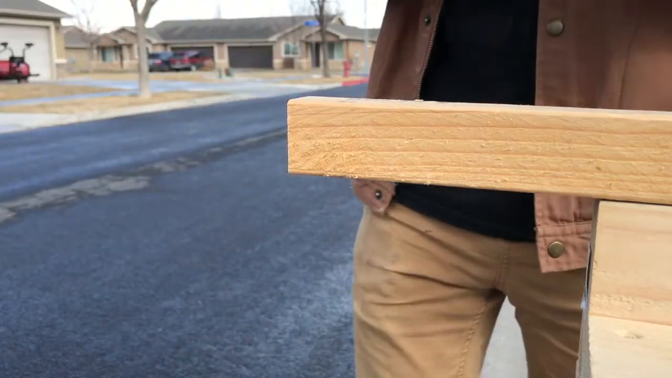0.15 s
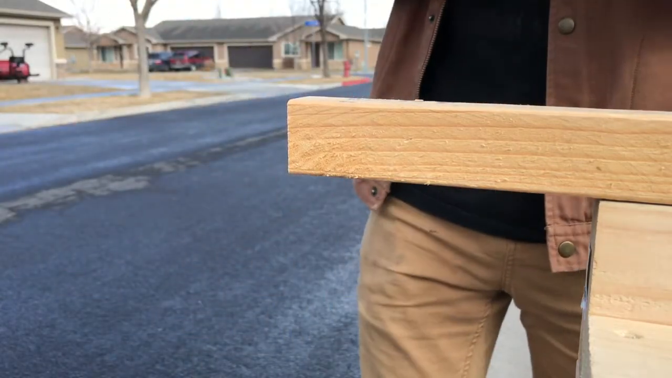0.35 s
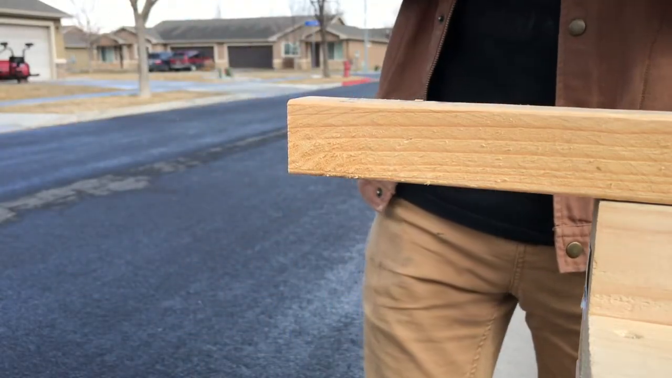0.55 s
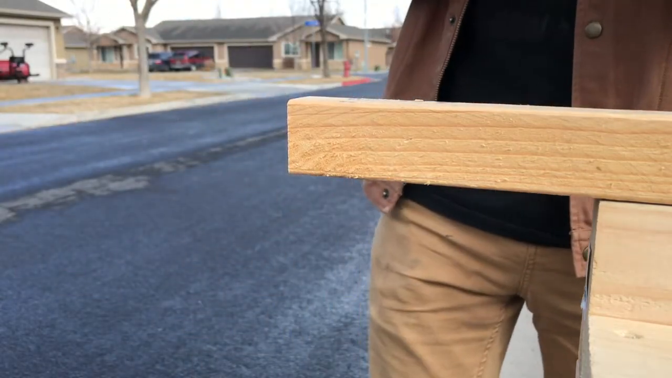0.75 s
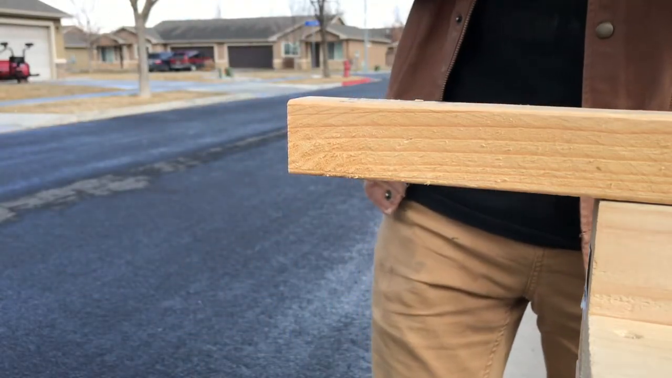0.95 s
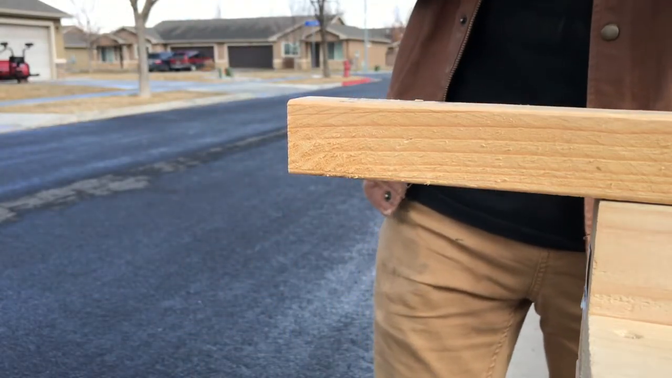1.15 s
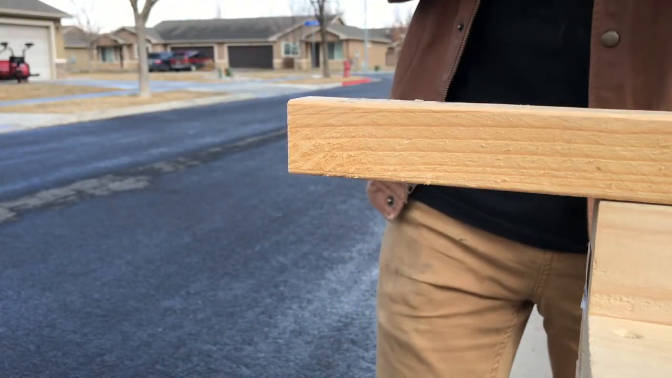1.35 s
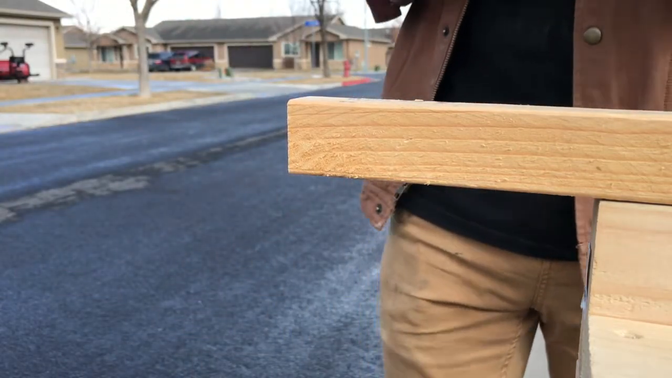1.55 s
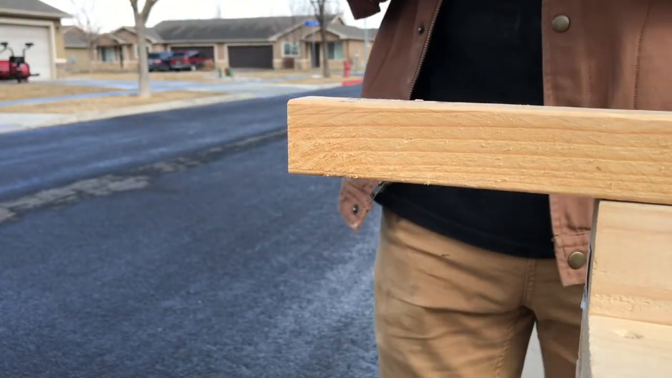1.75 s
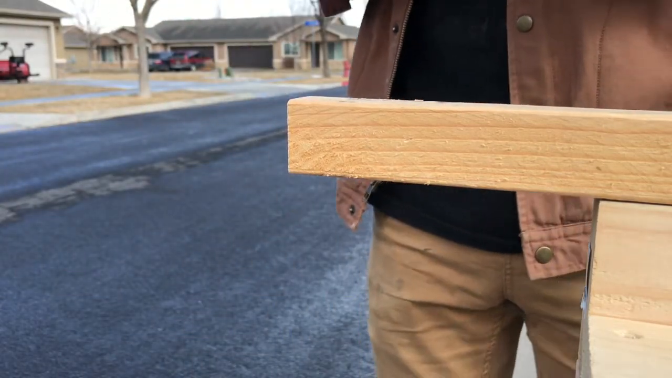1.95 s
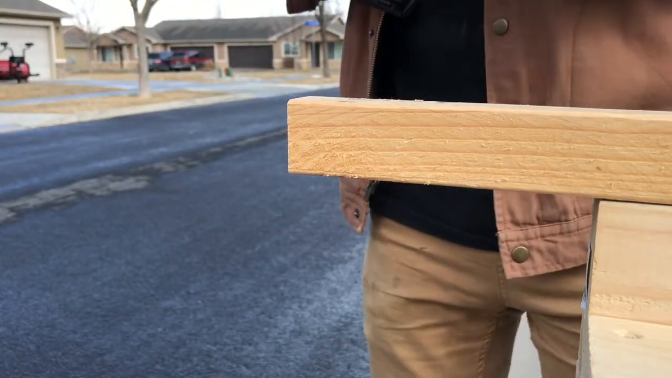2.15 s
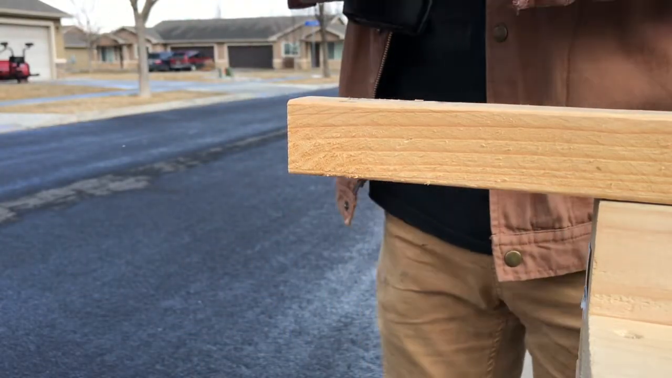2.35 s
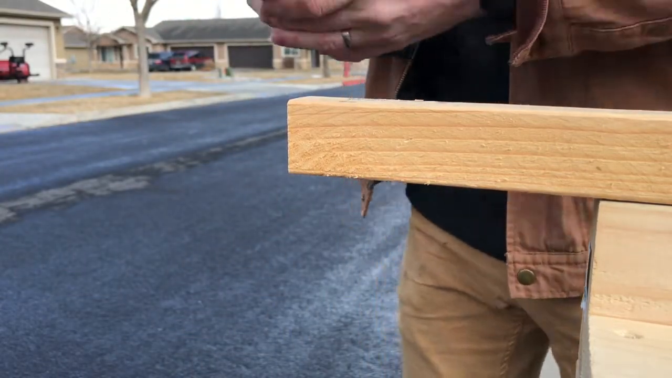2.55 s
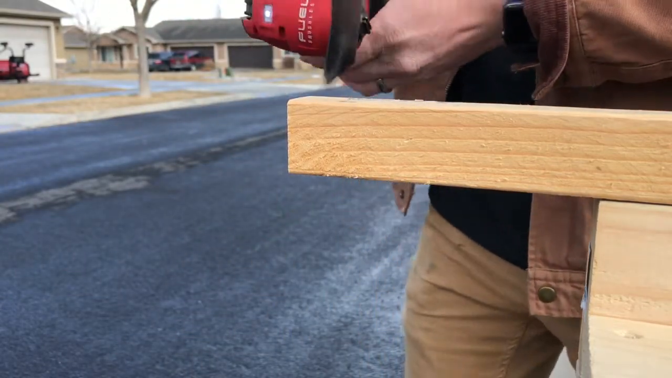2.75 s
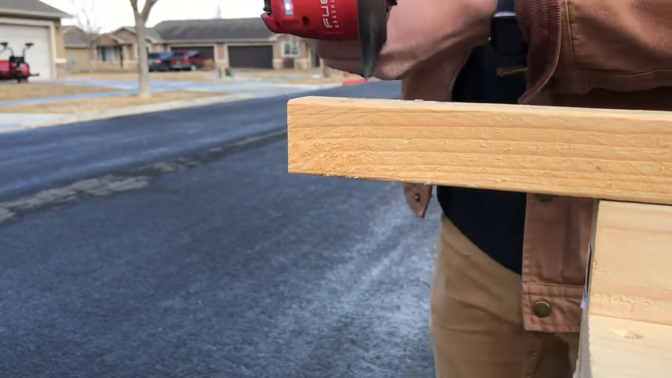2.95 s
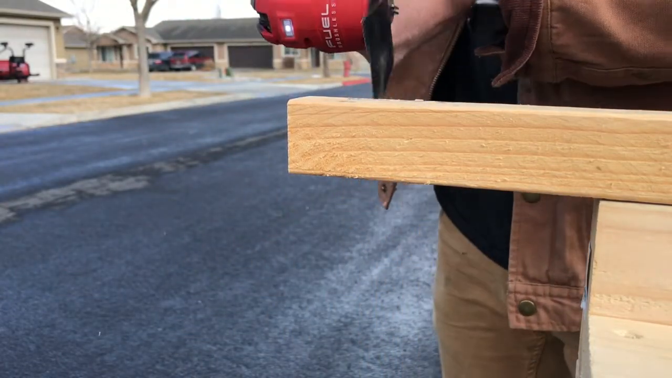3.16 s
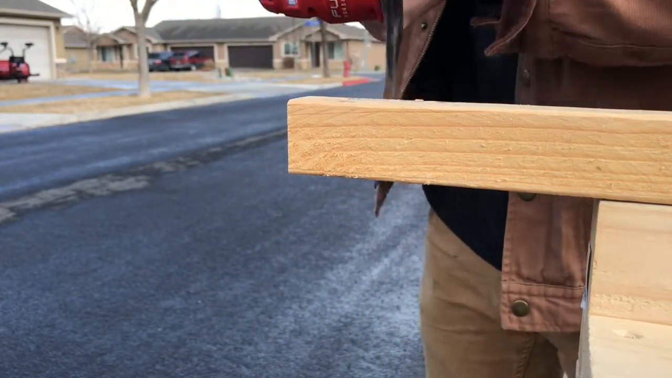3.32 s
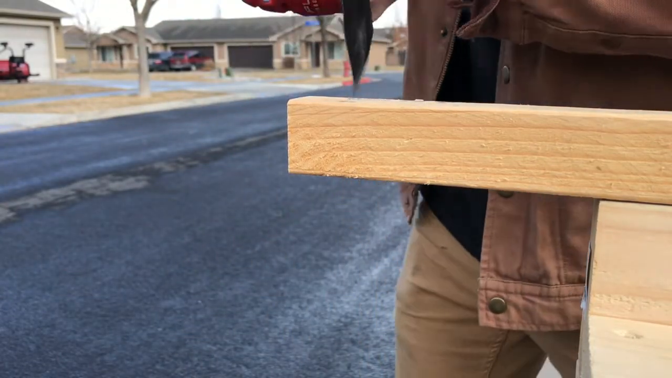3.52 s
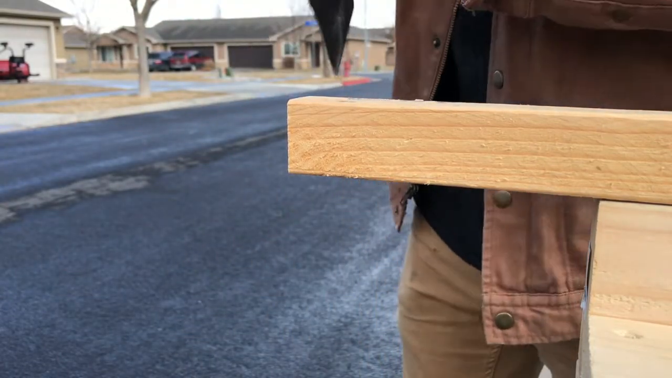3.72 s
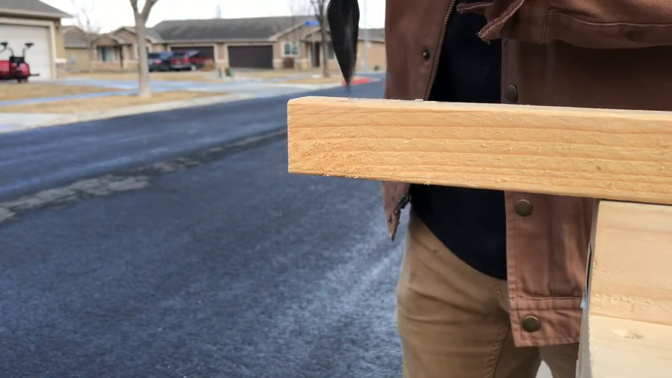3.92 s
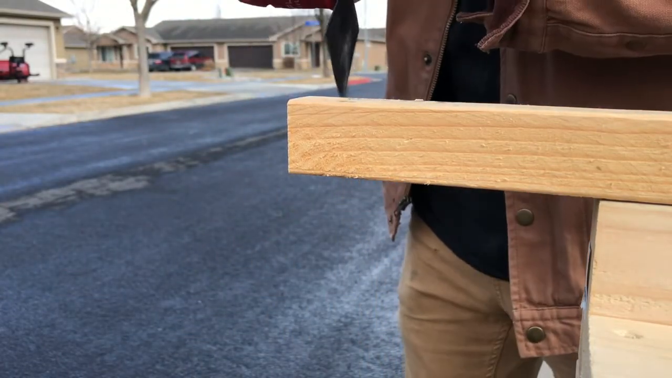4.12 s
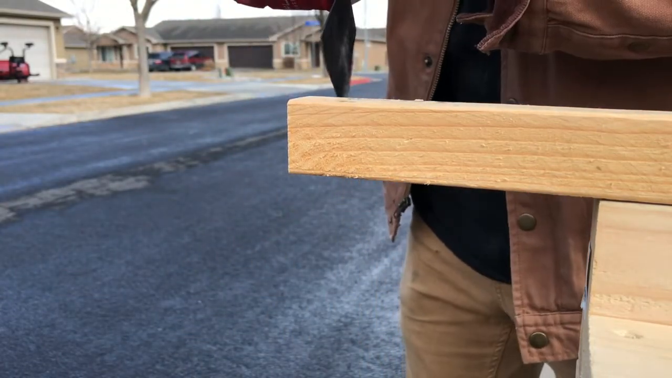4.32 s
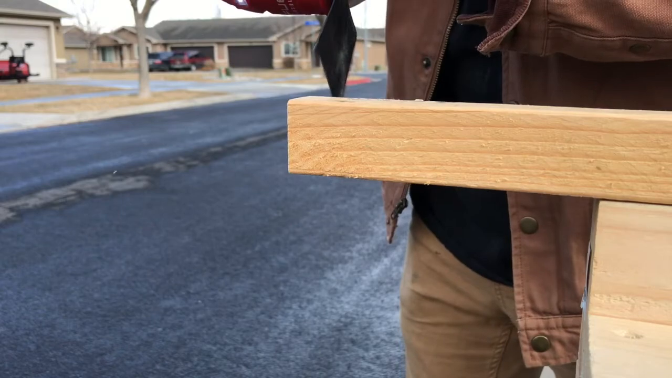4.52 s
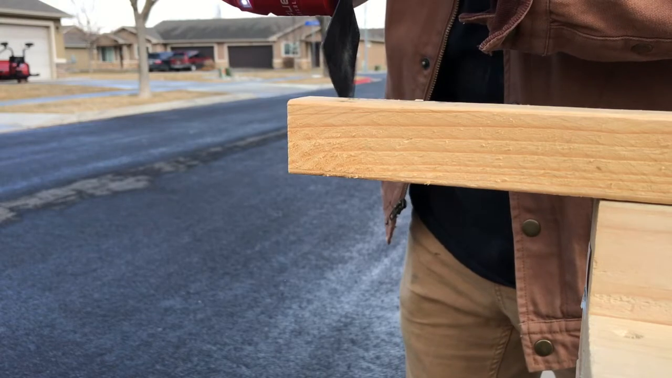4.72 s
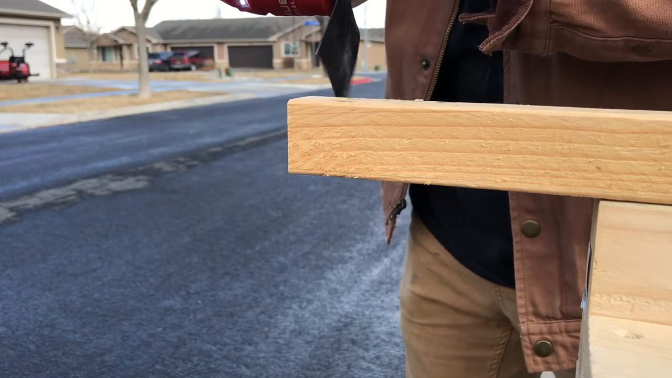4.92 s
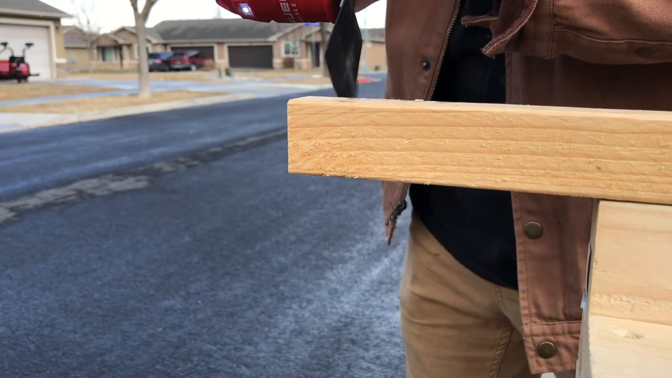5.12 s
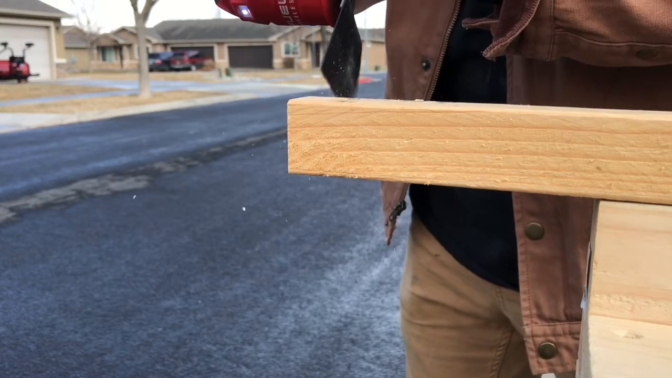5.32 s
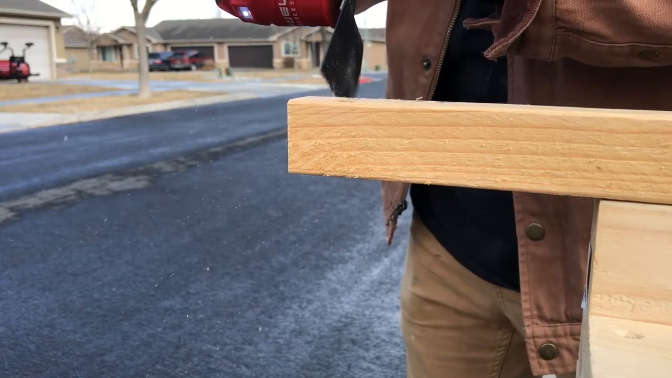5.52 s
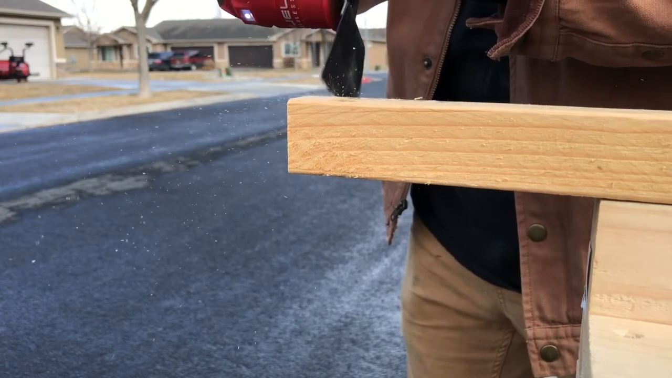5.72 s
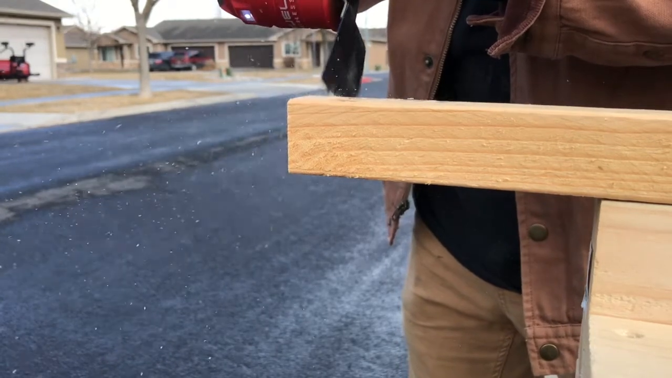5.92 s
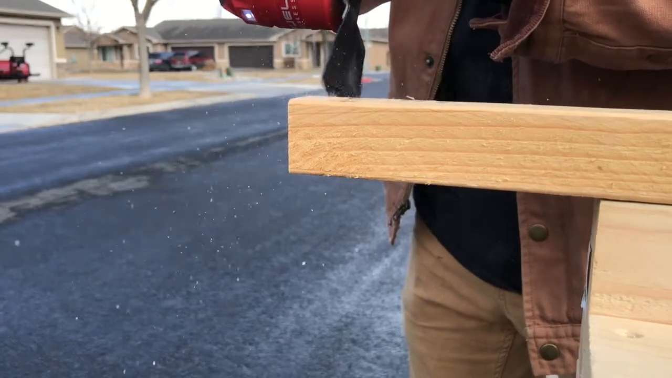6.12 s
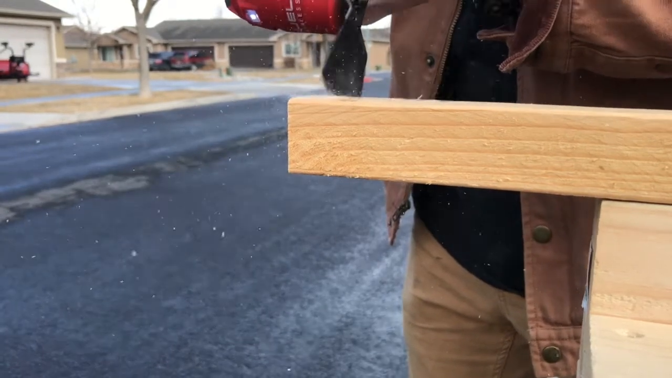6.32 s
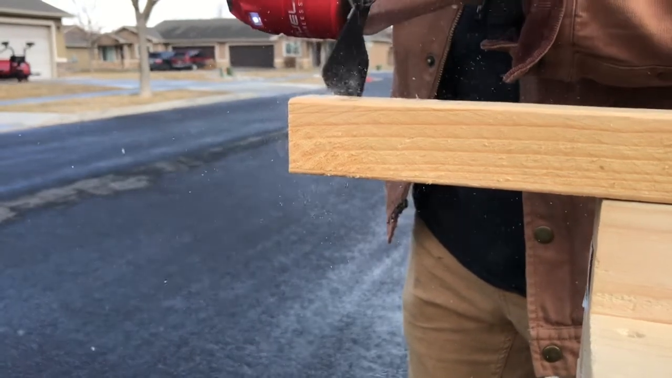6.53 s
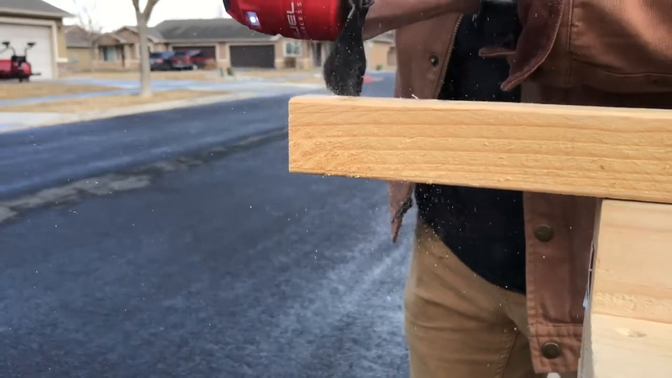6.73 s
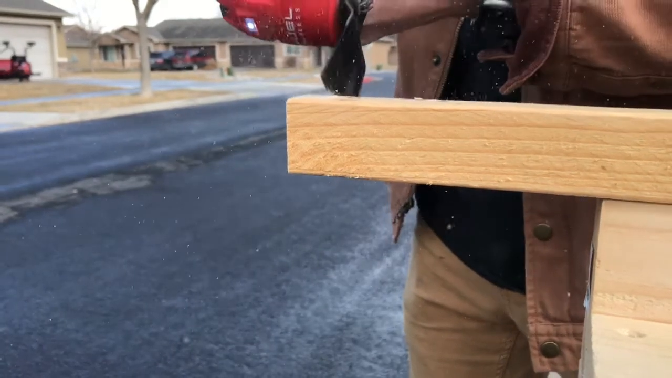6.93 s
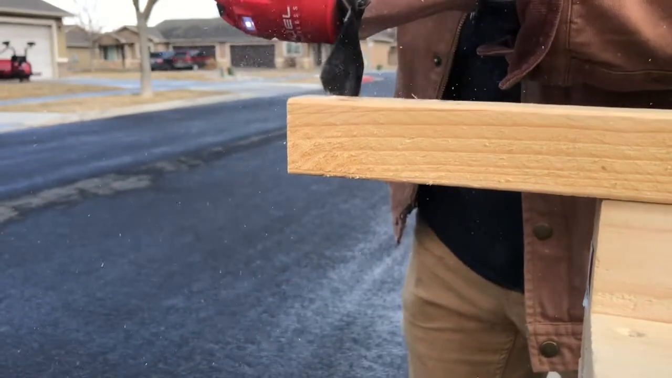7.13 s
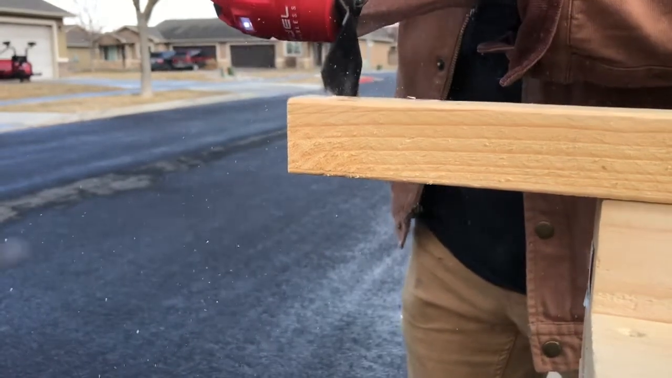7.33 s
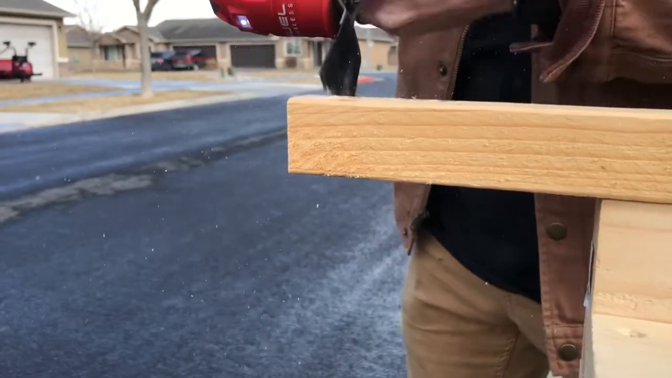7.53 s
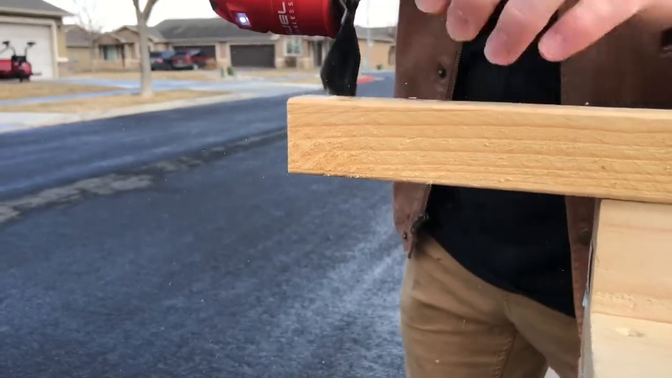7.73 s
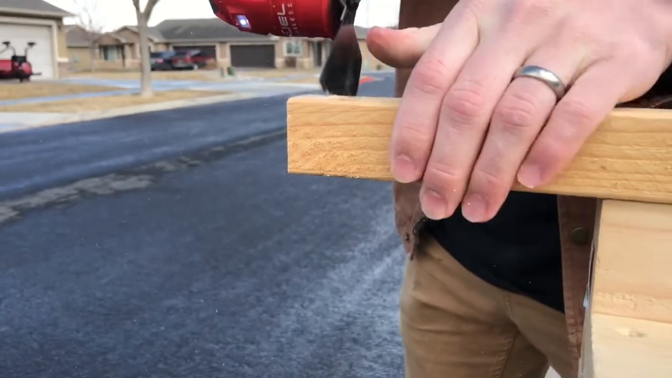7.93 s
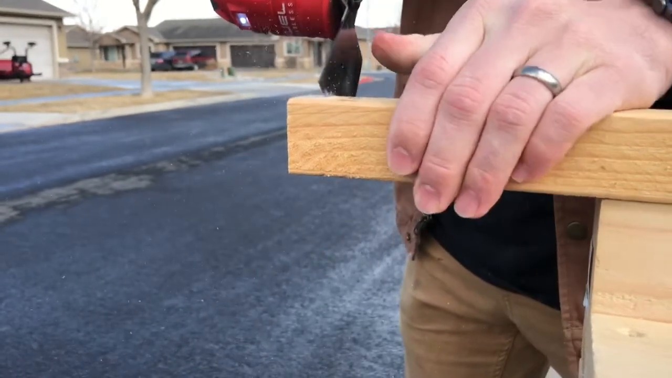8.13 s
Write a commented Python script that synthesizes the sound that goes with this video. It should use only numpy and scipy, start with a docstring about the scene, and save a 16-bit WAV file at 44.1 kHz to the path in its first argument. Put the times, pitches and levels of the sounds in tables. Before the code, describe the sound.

Wind rumbles softly before an oscillating power tool whines up suddenly, becomes quieter, then bites wood with a sagging, knocking, hissing buzz.

```python
"""A cordless oscillating multi-tool cuts a softwood plank: each stroke knocks the wood and sawdust hisses.
The knocks are stroke harmonics, the dust is pulsing noise, and the pitch sags as the hand pushes.
Before the cut the tool is switched on and lowered: its drive buzzes and rattles, the steel blade rings,
and soon after the start the level drops abruptly. Behind it, shaped noise makes a quiet, breezy street,
puffs of wind, and the rustle of hands and jacket."""
import sys
import numpy as np
from scipy import signal
from scipy.fft import rfft, irfft, next_fast_len
from scipy.io import wavfile
from scipy.ndimage import uniform_filter1d, map_coordinates

SR = 44100
rng = np.random.default_rng(int(sys.argv[2]) if len(sys.argv) > 2 else 0)


def inscribe(sig):
    """Save sig as 16-bit PCM at rate SR to the path in sys.argv[1].

    A 1-D sig is mono; a 2-D sig holds one channel per row.
    Samples are clipped to [-1, 1] before scaling.
    """
    pcm = np.round(np.clip(np.atleast_2d(sig).T, -1, 1) * 32767)
    wavfile.write(sys.argv[1], SR, pcm.astype(np.int16))


N = 364707
# samples a control frame, points a stroke, harmonics computed
HOP, POINTS, HARMONICS = 220, 1024, 50
TIME = np.arange(N) / SR
FRAMES = np.arange(N // HOP + 2) * HOP / SR
ORDER = np.arange(1, HARMONICS + 1)


def undb(db):
    """Decibels to gain."""
    return 10 ** (np.asarray(db) / 20)


def curve(table, t):
    """The columns of a table after its times, joined by straight lines, at times t."""
    s, *columns = np.transpose(table)
    return [np.interp(t, s, c) for c in columns]


def ramp(t, start, length):
    """Rises evenly from 0 to 1 over the given time."""
    return np.clip((t - start) / length, 0, 1)


def bursts(table):
    """Gain made of bell-shaped swells (t/s, half length/s, level/dB)."""
    return sum(undb(db) * np.exp(-((TIME - s) / length) ** 2) for s, length, db in table)


def unit(x):
    """Scale to rms 1."""
    return x / np.sqrt(np.mean(x ** 2))


def noise(gain_at):
    """Unit noise whose spectrum follows a function of frequency."""
    size = next_fast_len(N)
    hz = np.arange(size // 2 + 1) * SR / size + 1
    spectrum = rfft(rng.standard_normal(size)) * gain_at(hz)
    return unit(irfft(spectrum, size)[:N])


def colour(points, hz):
    """Gain of a (f/Hz, level/dB) spectrum at the given frequencies."""
    f, db = np.transpose(points)
    return undb(np.interp(np.log(hz), np.log(f), db))


def coloured_noise(points):
    """Unit noise with a (f/Hz, level/dB) spectrum."""
    return noise(lambda hz: colour(points, hz))


def wander(rate):
    """Smooth random drift, one column a harmonic, rms 1 overall; faster movement than rate (Hz) fades."""
    steps = rfft(rng.standard_normal((len(FRAMES), HARMONICS)), axis=0)
    hz = np.arange(len(steps))[:, None] / FRAMES[-1]
    return unit(irfft(steps / (1 + (hz / rate) ** 2), len(FRAMES), axis=0))


def catching(rate):
    """Random levels for each harmonic that hold, then jump about rate times a second."""
    spell = np.cumsum(rng.random(len(FRAMES)) < rate * HOP / SR)
    levels = rng.standard_normal((len(FRAMES), HARMONICS))[spell]
    return uniform_filter1d(levels, size=4, axis=0)


def harmonics(table, top_db, fall_db):
    """Levels of all harmonics; above the table they start at top_db and fall by fall_db an octave."""
    k, db = np.transpose(table)
    listed = np.interp(ORDER, k, db - db.max())
    return np.where(ORDER <= k[-1], listed, top_db - fall_db * np.log2(ORDER / k[-1]))


def strokes(turns, partials):
    """Play complex harmonic amplitudes (frames x harmonics) on the shaft's turning."""
    cycles = irfft(np.pad(partials, ((0, 0), (1, 0))), POINTS) * POINTS / np.sqrt(2)
    cycles = np.hstack([cycles, cycles[:, :1]])  # close the loop
    return map_coordinates(cycles, [np.arange(N) / HOP, turns % 1 * POINTS], order=1)


def pulsing(turns, depth):
    """A gain of rms 1 that peaks once a turn."""
    return unit(np.exp(depth * np.cos(2 * np.pi * turns)))


# colour of the far traffic: f/Hz, level/dB (relative)
STREET_COLOUR = [(30, -45), (200, -2), (500, -6.5), (1000, 1.5), (1500, -7.5), (2500, -18.5), (4500, -26.5),
                 (10000, -31.5), (15000, -23.5)]


def street():
    """Far traffic: coloured noise that swells and fades slowly at random."""
    swell_db = np.interp(TIME, FRAMES, wander(1)[:, 0])
    return coloured_noise(STREET_COLOUR) * undb(swell_db - 61.5)


# colour of the wind's rumble: f/Hz, level/dB (relative)
WIND_COLOUR = [(20, -22), (48, 0), (90, -5), (200, -20), (400, -36), (4000, -110)]
# the breeze, which rises and then mostly dies away: t/s, level/dB (before the flutter)
BREEZE = [(0, -48), (1.35, -40.5), (1.55, -55.5), (2.0, -56.5), (2.3, -62), (3.2, -64), (3.6, -76.5),
          (5.2, -72), (5.9, -88), (6.45, -73), (7.7, -93)]
# puffs of wind on the microphone: t/s, half length/s, level/dB (before their flutter and a 2.5 dB cut)
GUSTS = [(.72, 0.019, -32), (1.2, 0.033, -29.5), (1.34, 0.061, -36.5), (1.425, 0.012, -21.5),
         (1.63, 0.032, -36.5), (2.8, 0.035, -52), (3.1, 0.091, -53.5), (4.03, .04, -53),
         (4.45, 0.093, -44.5), (4.76, 0.064, -44), (5.05, 0.029, -45), (5.28, .12, -44)]
FLUTTER_HZ, FLUTTER_DB = 8.6, 3.5  # rate, and rms depth in the breeze


def wind():
    """Turbulent air rumbles low and flutters: a breeze with puffs on top."""
    rumble = coloured_noise(WIND_COLOUR)
    rumble = rumble / np.sqrt(uniform_filter1d(rumble ** 2, size=2205))  # even level over 50 ms
    flutter = np.interp(TIME, FRAMES, wander(FLUTTER_HZ)[:, 0])
    breeze = undb(curve(BREEZE, TIME)[0] + FLUTTER_DB * flutter)
    puffs = bursts(GUSTS) * undb(1.5 * flutter - 2.5)
    return rumble * (breeze + puffs)


# colour of rubbing cloth: f/Hz, level/dB (relative)
CLOTH_COLOUR = [(200, -20), (1000, -5), (4000, 6), (7000, 0.5), (10500, -2), (14000, -11)]
# sleeve and grip rustles, then the trigger: t/s, half length/s, level/dB
RUSTLES = [(.26, .069, -70.5), (.77, .015, -75), (1.0, .04, -79), (1.42, .04, -72), (1.48, 0.014, -65),
           (1.812, .008, -49.5)]


def rustles():
    """Hands and jacket rub in short swells of noise; the last is the trigger."""
    return coloured_noise(CLOTH_COLOUR) * bursts(RUSTLES)


# colour of the loose drive, for its click and its rattle: f/Hz, level/dB (relative)
RATTLE_COLOUR = [(100, -29), (480, -25), (850, -13), (1400, -5), (2600, -4), (4000, -0.5), (5200, 3),
                 (6800, -4.5), (8400, -3), (10000, -37), (11500, -0.5), (13400, -3.5), (14300, -4),
                 (15500, -3.5)]
CLICK_S, CLICK_DB = 1.855, -50


def click():
    """The drive takes up its play: noise that starts at once and dies within milliseconds."""
    decay = np.exp(-np.abs(TIME - CLICK_S) / 0.0051) * (TIME > CLICK_S)
    return coloured_noise(RATTLE_COLOUR) * undb(CLICK_DB) * decay


# pace while the hand pushes the blade into the wood: t/s, strokes per second f/Hz (before it wavers)
PUSHED_SPEED = [(5.39, 330), (5.77, 319.3), (5.95, 320.3), (6.26, 306), (6.51, 314.3), (6.6, 306),
                (6.62, 309.8), (6.73, 306.4), (6.77, 299.2), (6.85, 298.2), (7.03, 310.5), (7.13, 309.1),
                (7.35, 319.9), (7.44, 319.2), (7.6, 314.3), (7.91, 317.4), (8.1, 301.4), (8.27, 298.6)]
FREE_HZ = 332  # strokes per second when running free
START_S, RAMP_HZ_PER_S = 1.862, 1630
CREEP_HZ, CREEP_S = 8.5, .17  # the last few Hz arrive slowly
EASE_HZ = 14  # how softly the ramp rounds off
# the teeth skate, then bite over this time
BITE_S, BITE_TAKES_S = 5.233, 0.45


def since_full_ramp():
    """Seconds since the steady ramp would reach the free speed, 0 until then."""
    return np.maximum(TIME - START_S - FREE_HZ / RAMP_HZ_PER_S, 0)


def motor():
    """Strokes per second: a ramp, a creep to free speed and a sag in the wood, wavering slightly."""
    rising = RAMP_HZ_PER_S * (TIME - START_S)
    held, = curve([(BITE_S, FREE_HZ)] + list(PUSHED_SPEED), TIME)
    waver = 0.16 * np.sin(2 * np.pi * 17.0 * TIME)
    waver = waver + 0.2836 * np.interp(TIME, FRAMES, wander(25.5)[:, 0])
    held = held - CREEP_HZ * np.exp(-since_full_ramp() / CREEP_S) + waver
    # a soft minimum of the ramp and the held speed
    return np.maximum(-EASE_HZ * np.logaddexp(-rising / EASE_HZ, -held / EASE_HZ), 0)


# hum of the housing as the tool is turned and pressed: t/s, level/dB (at free speed, before the drop)
HUM = [(2.08, -38.5), (2.6, -47), (3.7, -36), (5.1, -35.5), (5.25, -41), (5.5, -28.5), (5.9, -36),
       (6.75, -29.5), (7.3, -34.5), (8.27, -32.5)]


def body(turns, speed):
    """The housing swings against the blade and hums at the stroke rate, louder with speed."""
    hum = np.sqrt(2) * np.cos(2 * np.pi * turns)
    return hum * (speed / FREE_HZ) ** 2 * undb(curve(HUM, TIME)[0])


# stroke harmonics when just started: multiple, level/dB (relative)
STARTING = [(1, -6.5), (2, -5), (3, -2.5), (4, -2.5), (5, -7.5), (6, -3.5), (7, -3.5), (8, -2), (9, -8),
            (10, -5), (11, -9), (12, -10), (13, 1), (14, -4), (15, 2), (16, -4.5), (17, 1), (18, -5.5),
            (19, -5), (20, -5), (21, -7), (22, -17), (23, -9), (24, -1.5)]
# stroke harmonics when running free: multiple, level/dB (relative)
FREE = [(1, -6), (2, -11), (3, 2.5), (4, -5.5), (5, -12), (6, -15.5), (7, -10), (8, -7.5), (9, -5.5),
        (10, -1), (11, -12), (12, -6.5), (13, -12.5), (14, -9), (15, -5), (16, -8.5), (17, -11.5),
        (18, -12.5), (19, -23), (20, -9.5), (21, -28), (22, -14), (23, -13), (24, -16), (25, -4.5),
        (26, -5.5), (27, -10.5), (28, -18)]
# echo from the plank lifts a band that rises, then slides down, ending as a dip: t/s, f/Hz, lift/dB
ECHO = [(2.05, 4960, 4.5), (2.3, 5900, 3.5), (2.5, 5900, 0), (2.8, 4687, 7.5), (3.3, 4070, 6),
        (4.2, 3305, -2.5)]
# the tool turns its blade down to the plank
TURN_S, TURN_TAKES_S = 2.4, 1.25
FACING_DB = 7.5  # halfway through the turn the flat of the blade faces the microphone and lifts the octave


def buzz(turns, speed):
    """The eccentric swings the blade: harmonics of the stroke above the hum, at rms near 1."""
    hz = np.maximum(np.interp(FRAMES, TIME, speed), 1)[:, None] * ORDER
    lowered = ramp(FRAMES, TURN_S, TURN_TAKES_S)[:, None]
    # resonances stay in place while the harmonics sweep up through them
    first = np.interp(hz / FREE_HZ, ORDER, harmonics(STARTING, -7.0, 5.8))
    later = np.interp(hz / FREE_HZ, ORDER, harmonics(FREE, -20.0, 3.8))
    echo_hz, echo_db = (c[:, None] for c in curve(ECHO, FRAMES))
    db = (1 - lowered) * first + lowered * later
    db = db + echo_db * np.exp(-(np.log(hz / echo_hz) / 0.093) ** 2)
    db = db + FACING_DB * np.sin(np.pi * lowered) * (ORDER == 2)
    db = db + 2.66 * wander(0.78) * np.minimum(ORDER / 6, 1)
    gains = undb(db) * (ORDER > 1)  # the hum is played by the housing
    gains = gains / np.linalg.norm(gains, axis=1, keepdims=True)
    # high harmonics are the least steady
    shake = np.minimum(ORDER * 0.023, .55) * (wander(34) + 1j * wander(5.8))
    # low harmonics push together once the blade is lowered
    lag = np.minimum(ORDER * 0.27 + 2 * (1 - lowered), 2.4) * rng.standard_normal(HARMONICS)
    treble_cut = 1 + (hz / 13500) ** 20
    return strokes(turns, gains * (1 + shake) * np.exp(1j * lag) / treble_cut)


def rattle(turns):
    """Play in the bearings rattles: noise that pulses once and twice a stroke."""
    return coloured_noise(RATTLE_COLOUR) * pulsing(turns, 0.24) * pulsing(2 * turns, 0.2)


# resonances of blade and housing: f/Hz, width/Hz, level/dB (relative, before dividing by root width)
STEEL = [(5460, 290, -10), (7100, 70, -28.5), (8400, 20, 1.5), (8700, 32, 1), (9100, 29, -3),
         (11000, 180, -3.5), (12941, 25, -25)]


def resonances(hz):
    """Summed gain of the steel's resonant peaks at each frequency."""
    return sum(undb(db) / np.sqrt(w) / (1 + (2 * (hz - f) / w) ** 2) ** 0.6 for f, w, db in STEEL)


def ring():
    """Blade and housing ring: noise through narrow resonances."""
    return noise(resonances)


# brief squeals of the blade: t/s, half length/s, level/dB (rms of each tone, before the drop)
SQUEALS = [(2.188, 0.039, -26), (2.255, 0.012, -35), (2.3, 0.014, -33.5)]


def squeal(turns):
    """The blade squeals in two equal tones, at 10 and 20 times the stroke rate."""
    angle = 2 * np.pi * turns
    return np.sqrt(2) * (np.sin(10 * angle) + np.sin(20 * angle)) * bursts(SQUEALS)


# levels at free speed, before strain, grip and drop; both grow as a power of the speed
BUZZ_DB, BUZZ_POWER = -26.5, 2.3
RATTLE_DB, RATTLE_POWER = -31, 1.83
# speeding up strains the drive and makes it louder, fading once it is at speed
STRAIN_BUZZ_DB, STRAIN_RATTLE_DB, STRAIN_S = 3.5, 5.5, 0.063
# the kerf closes round the blade and damps the drive
GRIP_S, GRIP_TAKES_S, GRIP_BUZZ_DB, GRIP_RATTLE_DB = 5.53, 0.3, -13.5, -5


def drive(turns, speed):
    """The mechanism sounds together: buzz, rattle, ringing steel and squeals, following the speed."""
    pace, gripped = speed / FREE_HZ, ramp(TIME, GRIP_S, GRIP_TAKES_S)
    strain = np.exp(-since_full_ramp() / STRAIN_S)
    buzz_db = BUZZ_DB + STRAIN_BUZZ_DB * strain + GRIP_BUZZ_DB * gripped
    rattle_db = RATTLE_DB + STRAIN_RATTLE_DB * strain + GRIP_RATTLE_DB * gripped
    buzzing = buzz(turns, speed) * pace ** BUZZ_POWER * undb(buzz_db)
    rattling = (rattle(turns) + undb(-2.0) * ring()) * pace ** RATTLE_POWER * undb(rattle_db)
    return buzzing + rattling + squeal(turns)


def zones(hz):
    """Shares of the four parts of the cut (plank tone, knock, scrape, hiss) at each frequency."""
    above = [1 / (1 + (edge / hz) ** 20) for edge in (1400, 3000, 7500)]
    return -np.diff([np.ones_like(hz), *above, np.zeros_like(hz)], axis=0)


# stroke harmonics when cutting lightly: multiple, level/dB (relative)
LIGHT = [(1, -9), (2, -4), (3, 2.5), (4, -12), (5, 0.5), (6, -13), (7, -10.5), (8, -4), (9, -13.5),
         (10, -8.5), (11, -4.5), (12, -9.5), (13, -13), (14, -6.5), (15, -7), (16, -5), (17, -15.5),
         (18, -17), (19, -10.5), (20, -13.5), (21, -9.5), (22, -15.5)]
# stroke harmonics when pushed hard: multiple, level/dB (relative)
HARD = [(1, -8), (2, -16), (3, 1.5), (4, -2.5), (5, -0.5), (6, -1), (7, -20), (8, -5.5), (9, -7), (10, -16),
        (11, -16), (12, -11), (13, -19), (14, -16), (15, -8.5), (16, -24.5), (17, -15), (18, -35)]


def tooth_harmonics(load, bite):
    """Harmonic gains of the teeth: a loose ringing blade, then the bite, changing as the load grows."""
    load, bite = load[:, None], bite[:, None]
    biting = (1 - load) * harmonics(LIGHT, -27.0, 7.8) + load * harmonics(HARD, -18.0, 2.5)
    # at first the plank passes on the drive's own buzz, and the loose blade rings near 3400 Hz
    skating = harmonics(FREE, -27, 5.1) + 11 * np.exp(-((ORDER * FREE_HZ - 3400) / 300) ** 2)
    db = bite * biting + (1 - bite) * skating
    db = db + (4.26 * catching(7) + 2.0 * wander(19)) * np.minimum(ORDER / 8, 1)
    return undb(db) * (ORDER > 1) / (1 + (ORDER / 46) ** 10)  # the very top is mostly dust


def tooth_phases(bite):
    """Once the teeth bite, low harmonics line up into one sharp knock; high ones scatter in the wood."""
    slow = np.minimum(ORDER * 0.18 + (1 - bite[:, None]), 1.6) * wander(1.83)
    return slow + np.minimum(ORDER * 0.026, .6) * wander(31)


# colour of the sawdust: f/Hz, level/dB (relative)
SAWDUST_COLOUR = [(100, -10), (450, -10), (850, 2), (2600, -4), (4500, -15), (7000, -5), (8500, -8),
                  (10000, -12), (12000, -4.5), (15500, -19)]
# the cut before its parts are balanced: t/s, force of the teeth level/dB, treble level/dB
CUT = [(5.13, -38, -34.5), (5.21, -39, -36), (5.54, -30.5, -33.5), (5.72, -32, -40.5), (5.77, -32, -35.5),
       (5.91, -34, -40.5), (6.06, -32.5, -39), (6.21, -35, -38), (6.23, -34.5, -43), (6.41, -36.5, -46),
       (6.45, -43, -53), (6.58, -34, -50.5), (6.62, -38, -53), (6.66, -34, -39), (6.83, -34.5, -37.5),
       (7.02, -41, -46), (7.08, -37, -40), (7.9, -35.5, -39), (7.92, -38, -46), (7.95, -37, -41),
       (8.02, -39.5, -44.5), (8.09, -35, -40), (8.16, -36, -35), (8.27, -37, -34.5)]
# plank tone, knock, scrape, hiss: level/dB against the cut, change at full load/dB,
# change per second of cutting/dB, extra rasp/dB
PARTS = [(-.5, 1, -0.93, -8), (-5, 1.5, .8, -7.5), (-1.5, 0.5, -0.4, -0.5), (-11.5, -0.5, 1.35, 8)]
# the teeth snatch at the fibres and the hiss sizzles: t/s, half length/s, level/dB (before the stutter)
SPURTS = [(5.52, .015, -35), (7.08, 0.13, -47), (7.21, .03, -43), (7.73, 0.038, -45), (7.96, 0.023, -46)]
# fibres tear loose in short rasps: t/s, half length/s, level/dB (before pulsing and chips)
SPLINTERS = [(5.19, .02, -43), (5.28, .016, -44), (5.325, .02, -39), (5.53, .02, -42), (6.59, .025, -46),
             (6.76, .015, -44), (7.75, .02, -43)]
TOUCH_S = 5.125  # the teeth touch the wood
SKATE_DB, SKATE_TREBLE_DB = -3, -6  # the cut is weaker until the teeth bite
# load begins when the motor sags below this speed and is full this much lower
DIG_HZ, DIG_RANGE_HZ = 310, 8
# dust against knocks (dB) at a firm force (dB), its rise per dB less force, and extra while skating (dB)
RASP_DB, FIRM_DB, RASP_SLOPE, SKATE_RASP_DB = -13.5, -35, 0.93, 6


def cut(turns):
    """The teeth knock the plank each stroke and tear off dust; lighter pressure makes more rasp."""
    hz, = curve(PUSHED_SPEED, FRAMES)
    load = np.clip((DIG_HZ - hz) / DIG_RANGE_HZ, 0, 1)
    bite = ramp(FRAMES, BITE_S, BITE_TAKES_S)
    gains, phases = tooth_harmonics(load, bite), tooth_phases(bite)
    force_db, treble_db = curve(CUT, FRAMES)
    rasp_base_db = RASP_DB + RASP_SLOPE * (FIRM_DB - force_db) + SKATE_RASP_DB * (1 - bite)
    low_db = force_db + SKATE_DB * (1 - bite)
    high_db = treble_db + SKATE_TREBLE_DB * (1 - bite)
    cutting_s = np.maximum(FRAMES - TOUCH_S, 0)
    # the grip slips, most in the treble
    stutter = undb(wander(24) * np.minimum(ORDER * 0.53, 2.2)).T
    partials, dust = 0, 0
    for part, (own_db, load_db, per_s_db, rasp_db) in enumerate(PARTS):
        level_db = (low_db if part < 2 else high_db) + own_db + load_db * load + per_s_db * cutting_s
        rough = undb(rasp_base_db + rasp_db)
        is_hiss = part == len(PARTS) - 1
        sizzle = np.interp(FRAMES, TIME, bursts(SPURTS)) if is_hiss else 0
        # knocks and dust share the power of the part
        tone = np.hypot(undb(level_db), sizzle) * stutter[part] / np.sqrt(1 + rough ** 2)
        share = gains * zones(ORDER * np.mean(hz))[part]
        partials = partials + share / np.linalg.norm(share, axis=1, keepdims=True) * tone[:, None]
        part_dust = noise(lambda f: colour(SAWDUST_COLOUR, f) * zones(f)[part])
        dust = dust + part_dust * np.interp(TIME, FRAMES, tone * rough)
    dust = dust + coloured_noise(SAWDUST_COLOUR) * bursts(SPLINTERS)
    # each stroke tears its own chip, most unevenly while the blade still skates on the surface
    chip_spread_db = np.interp(TIME, FRAMES, 3.8 - 4.5 * bite)
    chips = undb(rng.standard_normal(N // 100)[turns.astype(int)] * chip_spread_db)
    knocks = strokes(turns, partials * np.exp(1j * phases))
    return (knocks + dust * pulsing(turns, 0.11) * chips) * ramp(TIME, TOUCH_S, .005)


DROP_S, DROP_DB = 2.366, -14


def scene():
    """Tool and surroundings drop in level, dipping briefly lower; wind and cut keep their own level."""
    speed = motor()
    turns = np.cumsum(speed) / SR
    drop = undb(np.interp(TIME - DROP_S, [-.006, .004, .014], [0, DROP_DB - 11, DROP_DB]))
    surroundings = street() + rustles() + click()
    tool = drive(turns, speed) + body(turns, speed)
    return ((surroundings + tool) * drop + wind() + cut(turns))[None]


TOP_HZ = 15750


def record(dry):
    """A steep low-pass filter ends the treble."""
    return signal.sosfilt(signal.ellip(12, .2, 90, TOP_HZ, fs=SR, output="sos"), dry)


dry = scene()
out = record(dry)
inscribe(out)
```